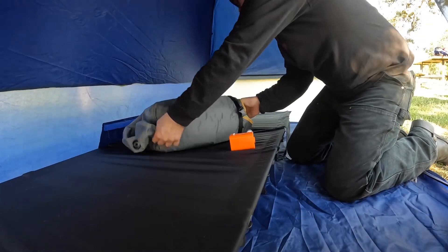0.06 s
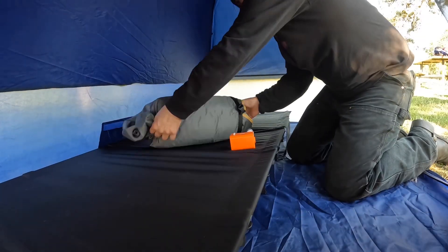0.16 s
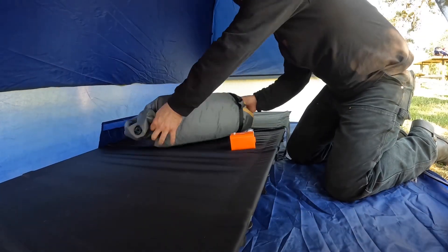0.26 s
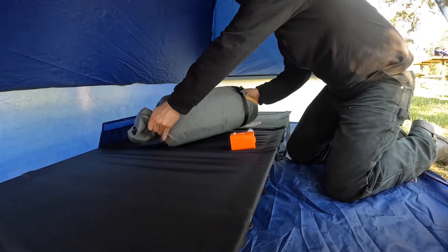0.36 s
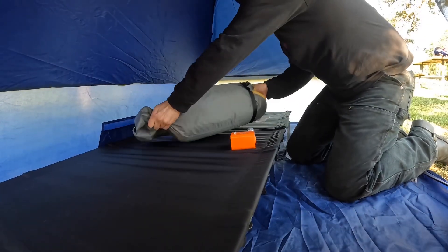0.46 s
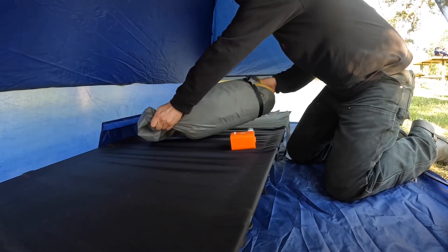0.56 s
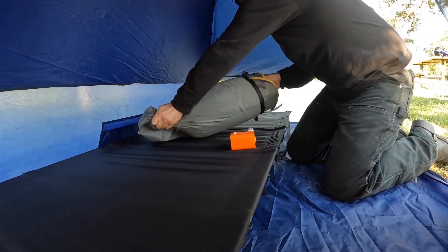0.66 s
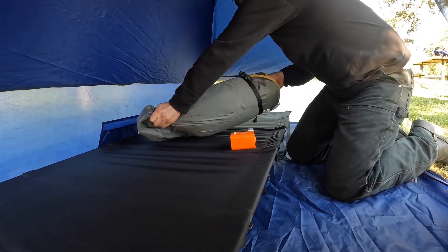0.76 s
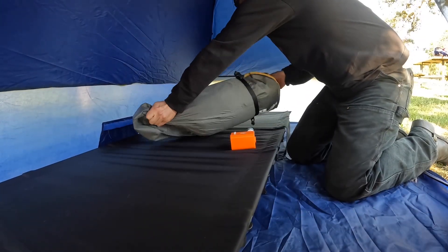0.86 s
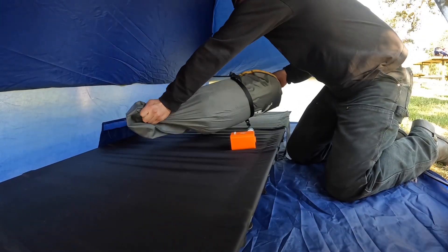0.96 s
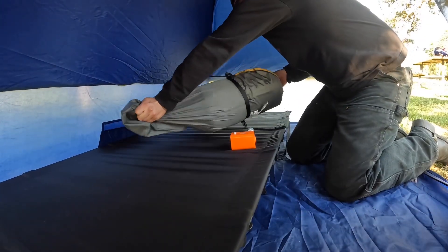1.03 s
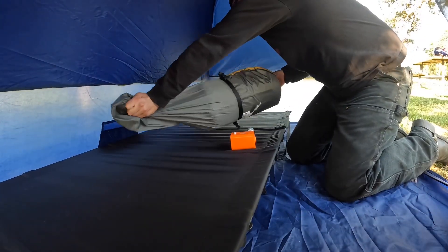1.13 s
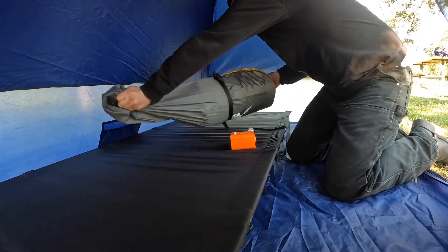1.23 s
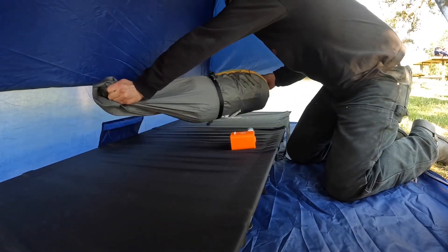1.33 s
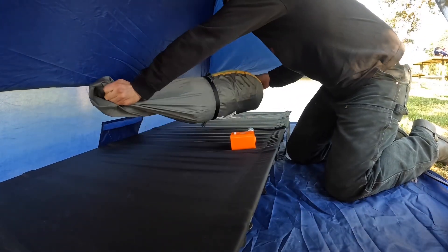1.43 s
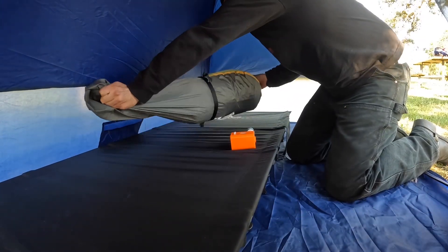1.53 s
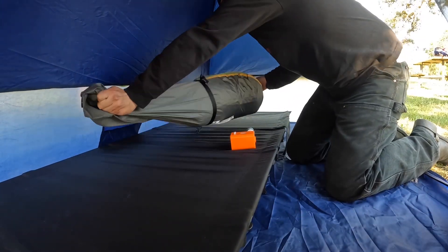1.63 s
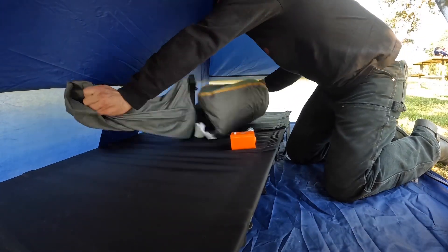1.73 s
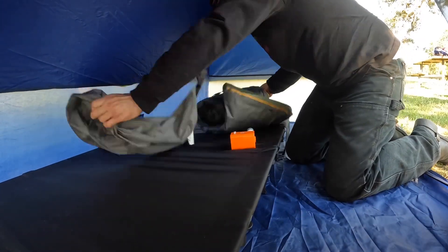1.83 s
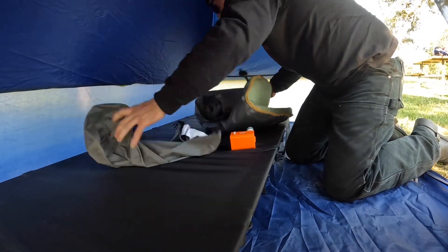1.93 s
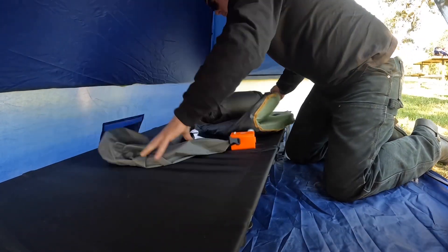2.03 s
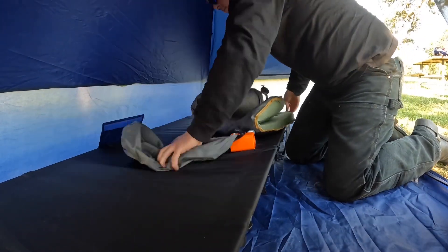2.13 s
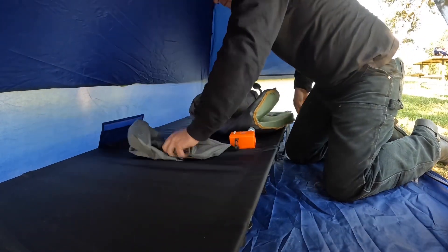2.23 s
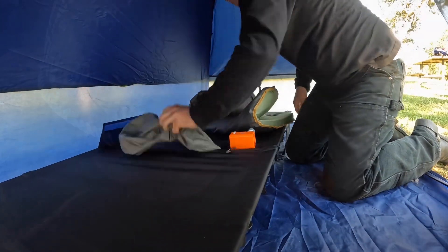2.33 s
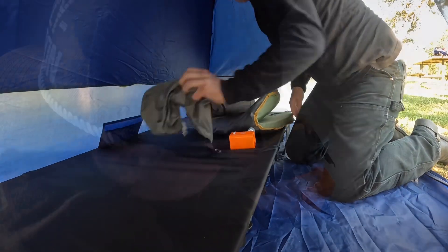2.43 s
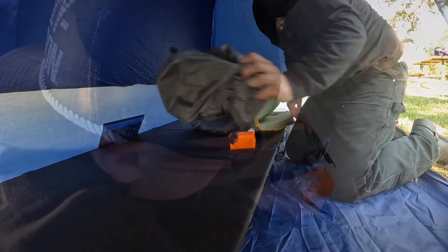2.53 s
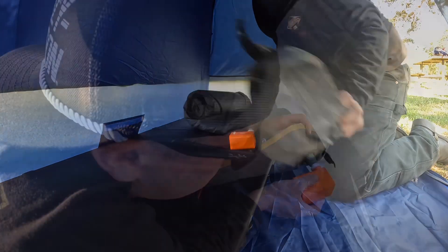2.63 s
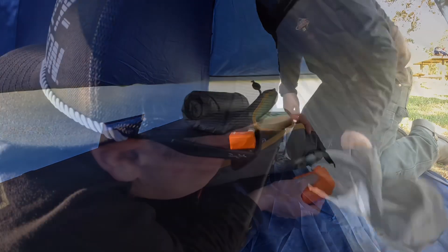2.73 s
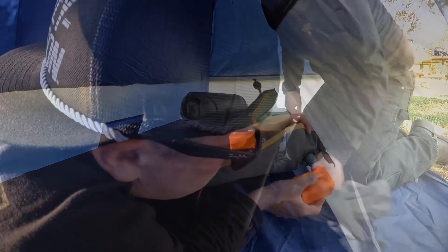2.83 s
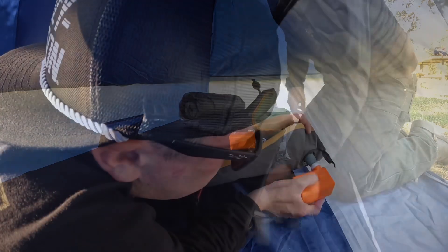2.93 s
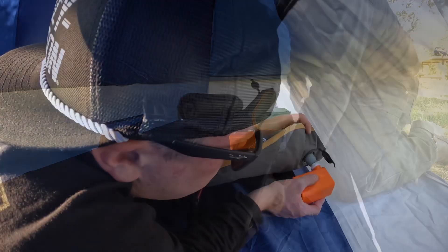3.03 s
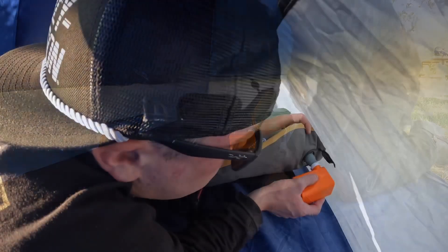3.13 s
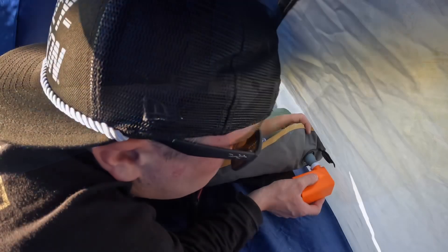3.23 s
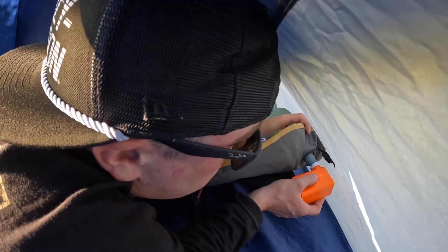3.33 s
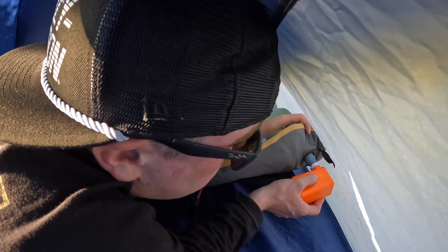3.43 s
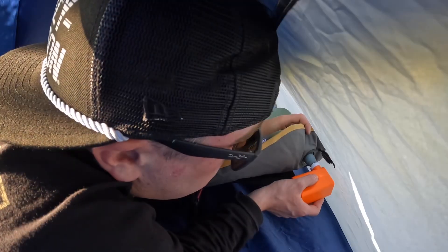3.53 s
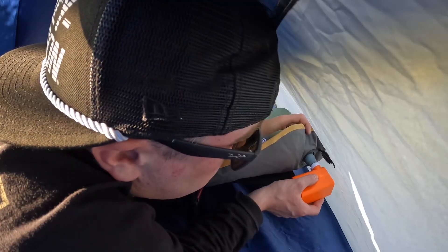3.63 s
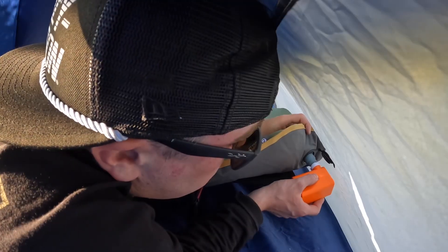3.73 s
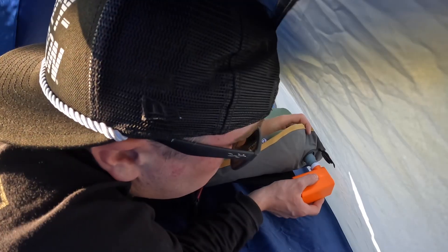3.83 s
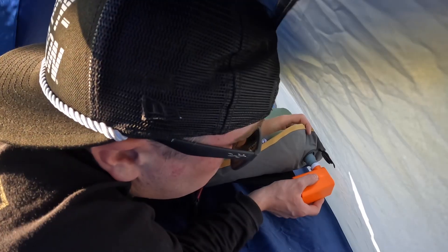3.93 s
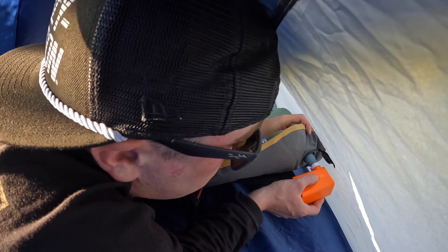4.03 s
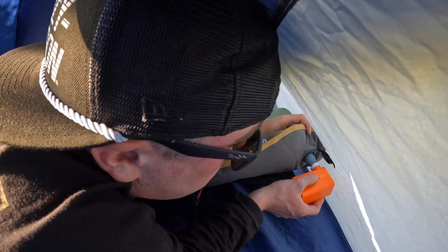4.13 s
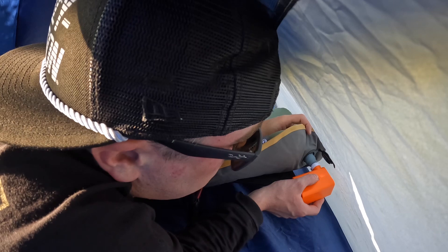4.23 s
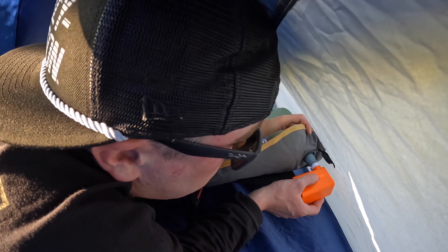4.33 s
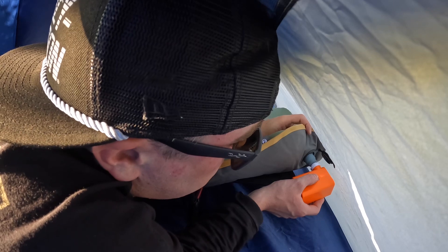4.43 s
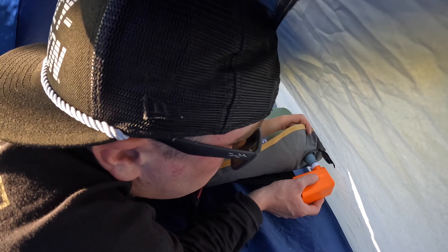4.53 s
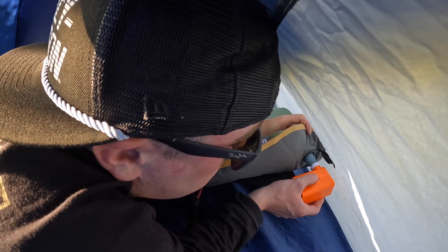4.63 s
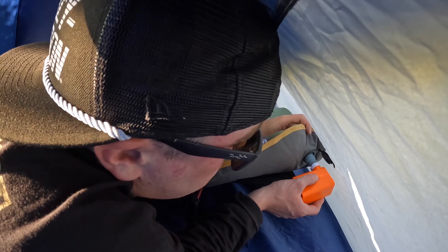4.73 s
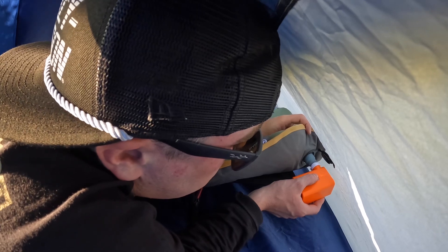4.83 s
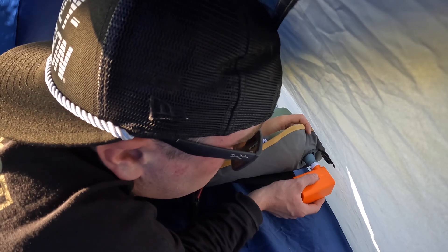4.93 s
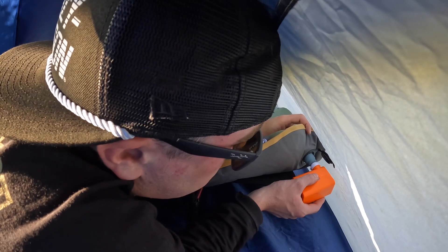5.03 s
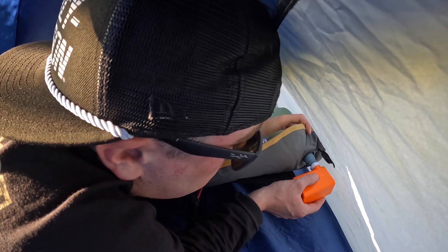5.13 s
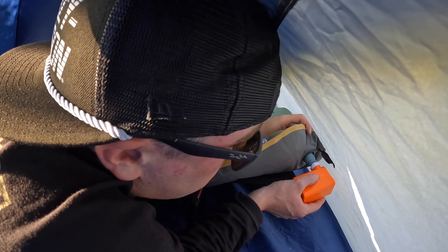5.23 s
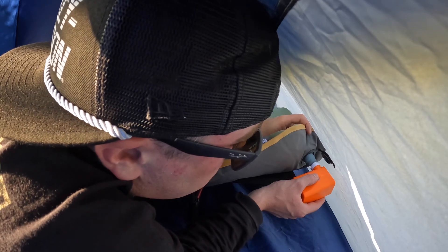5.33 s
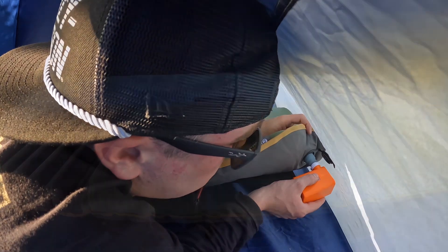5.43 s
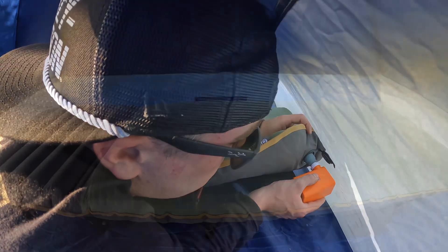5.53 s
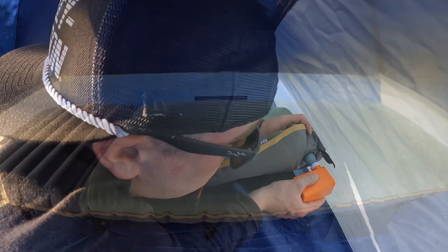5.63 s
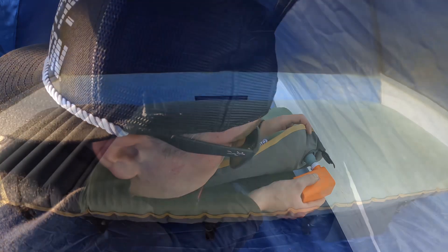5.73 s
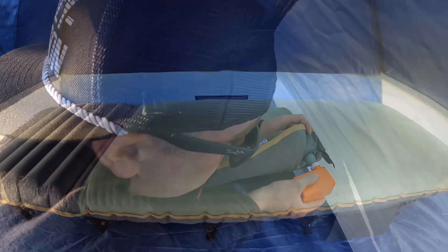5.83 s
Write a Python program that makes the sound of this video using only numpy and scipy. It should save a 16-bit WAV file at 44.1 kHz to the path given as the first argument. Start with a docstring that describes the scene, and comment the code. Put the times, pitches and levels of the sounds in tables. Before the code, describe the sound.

A sleeping pad is tugged from its fabric sack near a stereo microphone: scratchy friction, crackling folds, dull landing, one loud snap. After about three seconds the cloth stops. A hard click follows, then a tiny electric air pump runs with a high tone over rushing air, dry and close, above quiet low outdoor noise.

```python
"""Unpacking a sleeping pad and starting its air pump

Inside a tent, a rolled sleeping pad is pulled from its nylon sack: friction noise hisses and crinkles, folds snap
as short pressure swings, two stick-slip squeaks ring the cloth, and the soft roll thumps down.
A switch clicks and a small battery air pump spins up: shaft-order tones whine over turbulent noise rung by
the housing; its level eases off by some 5 dB from 5.42 s, still running. Filtered noise makes the low outdoor
rumble and faint far wash beneath."""
import sys
import numpy as np
from scipy import signal
from scipy.fft import rfft, irfft
from scipy.io import wavfile

SR = 44100
rng = np.random.default_rng(int(sys.argv[2]) if len(sys.argv) > 2 else 0)


def unload_audio(sound):
    """Save the sound as a 16-bit wav file, at the path given as the first command line argument."""
    columns = np.transpose(np.atleast_2d(sound))
    # keep every value between -1 and 1, then stretch to whole-number steps
    steps = np.round(np.clip(columns, -1, 1) * 32767)
    wavfile.write(sys.argv[1], SR, steps.astype(np.int16))


N = 258955
T = np.arange(N) / SR
HZ = np.fft.rfftfreq(N, 1 / SR)

# Stereo image of cloth and pump at the two microphone ports:
# (frequency [Hz], likeness of the ports [0-1], left lead [rad], left over right [dB])
CLOTH_IMAGE = [(100, 1, -0.12, -1.5), (700, 0.91, -0.27, 2), (1430, 0.83, -0.7, -2.5),
               (2180, 1, -0.16, 0.5), (3330, 0.77, -0.68, 1), (5060, 1, -0.2, -0.5),
               (8000, 0.8, -0.54, 2.5), (15000, 0.22, 0, 3.5)]
PUMP_IMAGE = [(300, 0.75, 0, 0.5), (810, .97, 0.41, -0.5), (1430, 0.85, -1.03, -3), (1750, .88, 0.98, -7.5),
              (2440, 1, 0.34, 3), (2880, 1, -2.06, -4.5), (3300, 0.4, -1, 0), (4470, .98, -0.2, -2),
              (6940, .98, -0.6, -0.5), (15000, 0.58, -0.08, 2)]
# Handfuls of cloth crumpling:
# (start [s], length [s], final level [dB], swell over the stroke [dB], release [dB/s])
FOLDS = [(0, 0.1, -39.5, -2.5, 68), (.29, .08, -47.5, 2, 60), (.43, .1, -39, -3, 52), (.7, .43, -37, 8, 68),
         (1.26, 0.15, -45.5, 3, 132), (1.53, .32, -35.5, 10.5, 120), (1.96, 0.097, -40.5, -1.5, 100),
         (2.14, 0.16, -37.5, 0.5, 176), (2.41, 0.042, -39.5, -2.5, 102), (2.71, .02, -49, -5, 60),
         (2.862, 0.031, -41, -7.5, 99), (3.015, 0.011, -43.5, -5, 150)]

ON_S, SPIN_UP_S, SPIN_UP_SHAPE = 3.55, 0.0756, 1.16  # motor start [s], time constant [s], exponent
BLADES = 8


def amp(db):
    """Decibels to an amplitude factor."""
    return 10 ** (np.asarray(db) / 20)


def unit(x):
    """Scales a signal to rms 1."""
    return x / np.sqrt(np.mean(abs(x) ** 2) + 1e-20)


def read(points, hz=HZ):
    """The columns of a table over frequency, interpolated on a log axis."""
    f, *columns = np.transpose(points)
    return [np.interp(np.log(hz + 1), np.log(f + 1), c) for c in columns]


def follow(rows, t=T):
    """The columns of a table over time."""
    s, *columns = np.transpose(rows)
    return [np.interp(t, s, c) for c in columns]


def add(mix, s, sound):
    """Adds a sound to the mix from this second on."""
    part = mix[max(round(s * SR), 0):][:len(sound)]
    part += sound[:len(part)]


def drift(rate_hz):
    """Smooth chance of rms 1, up to about this rate."""
    return unit(irfft(rfft(rng.standard_normal(N)) * np.exp(-(HZ / rate_hz) ** 2), N))


def resonate(x, hz, width):
    """A resonance of gain 1 that can follow a moving frequency."""
    turn = np.exp(2j * np.pi * np.cumsum(hz * np.ones(len(x))) / SR)
    r = np.exp(-np.pi * width / SR)
    # shift the resonance to 0 Hz, smooth, and shift back
    return 2 * (turn * signal.lfilter([1 - r], [1, -r], x / turn)).real


def bumps(resonances, hz):
    """Gain in dB of a set of resonances; each falls to half its dB at the edges of its width."""
    return sum(db * 2 ** -np.minimum((2 * (hz - centre) / width) ** 2, 20)
               for centre, width, db in resonances)


def ports(z, image):
    """Two unrelated spectra become the partly alike left and right microphone signals."""
    same, lead, tilt_db = read(image)
    same = np.clip(same, 0, 1)
    right = (same * z[0] + np.sqrt(1 - same ** 2) * z[1]) * np.exp(-1j * lead)
    return irfft(np.array([z[0] * amp(tilt_db / 2), right * amp(-tilt_db / 2)]), N)


def noise(colour_db, image, grain=1):
    """Stereo noise of rms 1; grain is the strength of the excitation, sample by sample."""
    spectra = rfft(rng.standard_normal((2, N)) * grain) * amp(colour_db)
    return unit(ports(spectra, image))


def tent(x, image, wet_db):
    """Places a sound between close cloth walls: a short scatter of reflections."""
    t = T[:SR // 8]
    scatter = rng.standard_normal((2, len(t))) * amp(-60 * t / 0.15) * (t > 0.003)
    scatter /= np.linalg.norm(scatter, axis=1, keepdims=True)
    _, lead, tilt_db = read(image)
    direct = np.array([amp(tilt_db / 2), amp(-tilt_db / 2) * np.exp(-1j * lead)])
    return irfft(rfft(x) * (direct + amp(wet_db) * rfft(scatter, N)), N)


def background():
    """Low rumble and a faint far wash come through the tent wall; the wash rises 8.5 dB from 2.65 to 3.15 s."""
    # Level of the rumble: (time [s], level [dB])
    rumble_level = [(0, -30), (.35, -33), (1.6, -35.5), (1.85, -30.5), (2.1, -34), (2.75, -36.5),
                    (3.2, -32.5), (3.7, -33.5), (4.1, -38.5), (5.87, -36.5)]
    # Relative spectra of the rumble and the far wash: (frequency [Hz], level per Hz [dB])
    rumble_colour = [(15, -18), (30, -3), (50, -0.5), (105, 2), (150, -8.5), (220, -13), (330, -26),
                     (600, -39), (2000, -53), (8000, -95)]
    wash_colour = [(150, -19), (350, -10), (550, -6), (800, -5), (1050, -0.5), (1350, -8.5), (1900, -13),
                   (3000, -22.5), (6000, -40), (10000, -38), (14000, -48)]
    # Stereo image: (frequency [Hz], likeness [0-1], left lead [rad], left over right [dB])
    outdoor_image = [(100, .978, 0, .3), (400, .95, 0, 0), (1300, .75, -.3, 0), (8000, .6, 0, 0)]
    rumble = noise(read(rumble_colour)[0], outdoor_image) * amp(follow(rumble_level)[0])
    wash_db = -52 + np.interp(T, [2.65, 3.15], [-6, 2.5])
    return rumble + noise(read(wash_colour)[0], outdoor_image) * amp(wash_db)


def thumps():
    """The soft roll pushes air as it lands: dull puffs with no ring."""
    # The pad shifting and dropping onto the cot: (time of peak [s], level [dB], half-length [s])
    landings = [(1.103, -43, .06), (1.574, -40, 0.074), (1.724, -40, 0.031), (1.818, -32, 0.024),
                (2.883, -48, 0.017)]
    # Relative spectrum of the puffs: (frequency [Hz], level per Hz [dB])
    thud_colour = [(60, -6), (130, -2), (200, -0.5), (290, -4.5), (420, -21), (900, -24), (4000, -70)]
    push = sum(amp(db) * np.exp(-((T - s) / length) ** 2) for s, db, length in landings)
    return push * noise(read(thud_colour)[0], CLOTH_IMAGE)


def strokes(rows):
    """Gain of a run of hand strokes: each takes hold, swells as it goes and dies away."""
    power = 1e-12
    for start, length, db, swell_db, release in rows:
        attack_s = 0.14 * np.sqrt(length)  # shorter strokes take hold faster
        attack = np.clip(1 + (T - start) / attack_s, 0, 1)  # complete at the start time
        to_go = np.clip(1 - (T - start) / length, 0, 1)
        release_db = release * np.maximum(T - start - length, 0)
        power = power + (attack * amp(db - swell_db * to_go - release_db)) ** 2
    return np.sqrt(power)


def creases(per_s, spread_db, size, length):
    """Excitation of cloth: steady friction plus brief slips of very uneven size."""
    slips = (rng.random(N) < per_s / SR) * amp(spread_db * np.minimum(rng.exponential(1, N), 4))
    slip_power = signal.lfilter([size ** 2], [1, -np.exp(-1 / (length * SR))], slips ** 2)
    return np.sqrt(1 + slip_power)


def nylon(crumple_db=-0.43, judder_db=0.86, clump_db=2, brighten=0.34):
    """Nylon sliding on nylon hisses, brighter in a strong pull; its folds crumple in coarser grains."""
    # Pulls of nylon over nylon, before judder and brightening:
    # (start [s], length [s], final level [dB], swell over the pull [dB], release [dB/s])
    pulls = [(0, 0.13, -36.5, -1.5, 160), (.29, 0.11, -42.5, 1, 70), (.43, 0.75, -33.5, 2, 90),
             (1.29, 0.12, -38, 1, 480), (1.535, .315, -35, 4.5, 126), (1.98, 0.058, -40.5, -2, 80),
             (2.14, .15, -33.5, 7.5, 400), (2.35, .13, -46, -6.5, 67), (2.6, 0.41, -52.5, -0.5, 90),
             (2.856, 0.022, -43, -3.5, 130), (3.016, 0.03, -46.5, -4.5, 90)]
    # Relative spectra of smooth sliding and of crumpling: (frequency [Hz], level per Hz [dB])
    hiss_colour = [(300, -34), (1500, -11), (3000, -4), (5200, -1), (7300, -1.5), (8700, -9),
                   (12000, -10.5), (13700, -19.5), (15500, -26)]
    crumple_colour = [(100, 0), (300, 0.5), (500, -4.5), (800, -1.5), (1150, 2.5), (1700, -4), (2800, -2),
                      (4500, -7.5), (9000, -24), (15000, -48)]
    slide, judder = strokes(pulls), drift(30)
    hiss = noise(read(hiss_colour)[0], CLOTH_IMAGE, creases(500, 1.9, 0.49, 0.00014))
    sizzle = irfft(rfft(hiss) * np.interp(HZ, [6500, 9000], [0, 1]), N)  # the top of the hiss
    hiss = hiss + sizzle * ((slide / amp(-42)) ** brighten - 1)
    hiss = hiss * amp(judder_db * judder)
    folds = noise(read(crumple_colour)[0], CLOTH_IMAGE, creases(180, 4.3, 0.74, 0.00036))
    folds = folds * amp(crumple_db + clump_db * judder)
    return hiss * slide + folds * strokes(FOLDS)


def crackle(per_s=16, over_db=9, spread_db=1.5, centre_hz=1970, octaves=1):
    """Small snaps at random moments, as strong as the crumpling around them; rows as for the loud snaps."""
    at = np.flatnonzero(rng.random(N) < per_s / SR)
    size, pitch = rng.standard_normal((2, N))[:, at]
    db = 20 * np.log10(strokes(FOLDS)[at]) + over_db + spread_db * size
    return list(zip(T[at], db, centre_hz * 2 ** (octaves * pitch), np.ones(len(at))))


def snaps(shiver=0.14, shiver_s=0.0051, width_hz=1400):
    """A taut fold flips over: a few pressure swings, then a brief shiver of the cloth."""
    # The loud folds snapping: (time [s], peak before the tent [dB], pitch [Hz], ring length [cycles])
    loud_snaps = [(0.068, -15.5, 1420, 0.52), (0.138, -27, 1180, 2.3), (1.0637, -24, 1940, 1),
                  (1.8602, -21.5, 2500, 0.76), (1.9012, -18.5, 2420, 0.71), (2.0156, -17, 1900, 0.42),
                  (2.0447, -16, 2240, 0.75), (2.2459, -8.5, 3480, 0.43), (2.4446, -27, 1950, 0.91),
                  (2.507, -29, 1450, 0.64), (2.7246, -29, 1900, 0.52), (2.848, -25, 3400, 1),
                  (2.8613, -16.5, 1280, 0.82), (2.8767, -22, 1550, 0.7), (2.8942, -25, 2740, 1.6),
                  (3.016, -23.5, 2400, 1.2), (3.0191, -23.5, 2900, 1.8), (3.0216, -19.5, 3900, .6)]
    out = np.zeros(N)
    t = T[:SR // 16] - T[SR // 200]  # zero at the peak of the flip
    shake = rng.standard_normal(N + len(t))
    for s, db, hz, cycles in loud_snaps + crackle():
        flip = np.exp(-(t * hz / cycles) ** 2) * np.cos(2 * np.pi * hz * t)
        cloth = resonate(resonate(shake[round(s * SR):][:len(t)], hz, width_hz), hz, 4000)
        tail = unit(cloth) * np.exp(-abs(t) / shiver_s) * (t > 0)
        add(out, s + t[0], amp(db) * (flip + shiver * tail))
    return tent(out, CLOTH_IMAGE, wet_db=-9.5)


def squeaks(width_hz=300, jitter=0.03, scrape=0.046):
    """Gripped nylon sticks and slips ever faster, ringing higher and shaking the sack less as it tightens."""
    # Stick-slip squeaks: (start [s], length [s], level [dB], moment of tightening [s], slip rate slack [1/s],
    # slip rate taut [1/s], ring slack [Hz], ring taut [Hz], slack sack body over ring [dB])
    grips = [(0.022, 0.007, -27.5, .013, 640, 1240, 636, 1200, -22),
             (2.228, .019, -20, 2.233, 198, 345, 820, 2790, 1.5)]
    # Resonances of the sack: (frequency [Hz], width [Hz], relative level [dB])
    sack = [(446, 72, -5), (684, 180, 8), (875, 110, 2)]
    rise_db_per_s, fall_db_per_s = 522, 680
    tighten_s, taut_body_db = 0.00798, -8.5
    out = np.zeros(N)
    for start, length, db, tighten_at, slack_rate, taut_rate, slack_hz, taut_hz, sack_db in grips:
        t = T[abs(T - start - length / 2) < 1 / 10]
        taut = (1 + np.tanh((t - tighten_at) / (2 * tighten_s))) / 2
        rate = slack_rate + (taut_rate - slack_rate) * taut ** 2
        ring_hz = slack_hz + (taut_hz - slack_hz) * taut
        body_db = sack_db + taut_body_db * taut
        grip_db = db - rise_db_per_s * np.maximum(start - t, 0)
        grip_db = grip_db - fall_db_per_s * np.maximum(t - start - length, 0)
        turns = np.cumsum(rate * (1 + jitter * drift(190)[:len(t)])) / SR
        slips = np.diff(np.floor(turns), prepend=0)  # one impulse a slip
        slips = slips + scrape * rng.standard_normal(N)[:len(t)]
        ring = resonate(resonate(slips, ring_hz, width_hz), ring_hz, 1200)
        body = sum(amp(d) * resonate(resonate(slips, f, w), f, 900) for f, w, d in sack)
        blend = (unit(ring) + amp(body_db) * unit(body)) / np.hypot(1, amp(body_db))
        add(out, t[0], amp(grip_db) * blend)
    return tent(out, CLOTH_IMAGE, wet_db=-13)


def switch():
    """The button clicks down and up, ringing the plastic case."""
    # Clicks: (time [s], peak before the tent [dB])
    clicks = [(3.5239, -19), (3.557, -46)]
    # Modes of the plastic case: (frequency [Hz], relative level [dB], time to fall 60 dB [s])
    case = [(1020, 0, 0.026), (2920, 2, 0.015), (3880, 8, 0.017), (4130, 6, 0.013), (5700, -8, .012),
            (7600, 6, 0.013), (11500, -22, 0.022)]
    out, t = np.zeros(N), T[:SR // 16]
    ring = sum(amp(db - 60 * t / t60) * np.sin(2 * np.pi * hz * t) for hz, db, t60 in case)
    contact = resonate(rng.standard_normal(len(t)), 4000, 5000) * 2 * np.exp(-t / 0.002)
    ring += contact
    for s, db in clicks:
        add(out, s, amp(db) * ring / abs(ring).max())
    return tent(out, PUMP_IMAGE, wet_db=-11)


def spin():
    """The motor's share of its running speed, 0 to 1, closing in on it after switch-on."""
    return 1 - np.exp(-(np.maximum(T - ON_S, 0) / SPIN_UP_S) ** SPIN_UP_SHAPE)


def shaft():
    """Turns of the impeller per second, the running speed shifting a little with the load."""
    # Running speed: (time [s], blade tone [Hz])
    running = [(3.9, 3417), (4.014, 3414), (4.492, 3395), (5.068, 3393), (5.38, 3346), (5.776, 3407),
               (5.87, 3390)]
    return spin() * follow(running)[0] / BLADES


def rattle(level_db=-14.5, knock_turns=0.47):
    """The rotor scrapes once a turn and shakes the plastic shell, as hard as speed times starting torque."""
    # Resonances of the shell: (frequency [Hz], width [Hz], relative level [dB])
    shell_modes = [(2930, 460, 1), (3660, 190, -1), (4700, 130, -2.5)]
    turns, torque = np.cumsum(shaft()) / SR, 1 - spin()
    scrapes = rng.standard_normal(N) * (1.2 + np.exp(-(turns % 1) / knock_turns))
    shell = sum(amp(db) * resonate(resonate(scrapes, hz, width), hz, 1200) for hz, width, db in shell_modes)
    return tent(unit(shell) * amp(level_db) * spin() * torque, PUMP_IMAGE, wet_db=-16)


def air(level_db=-25.5, growth_db=23, churn_db=0.34):
    """Turbulent air rings the cavities of the pump housing, louder as the impeller speeds up."""
    # Relative spectrum of the rush: (frequency [Hz], level per Hz [dB])
    air_colour = [(150, -5.5), (400, -13), (720, -6.5), (900, 4), (1350, 3.5), (2200, -6), (3200, 2),
                  (4200, -4), (6500, -4), (8200, -9.5), (10500, -14.5), (12500, -15.5), (13700, -24),
                  (14600, -40)]
    # Cavity resonances of the housing: (frequency [Hz], width [Hz], gain [dB])
    housing = [(627, 120, 5.5), (703, 54, -9.5), (984, 245, 9.5), (1264, 160, 3), (1800, 380, 7.5),
               (2480, 420, 3), (2843, 130, 8.5), (3039, 120, 9.5), (4030, 240, -0.5), (4140, 67, 8),
               (4400, 200, -3.5), (4784, 280, 9), (4943, 206, 8), (5190, 160, 11), (5730, 350, 7),
               (6680, 260, 5.5), (7470, 280, 6.5), (10570, 450, 6)]
    rush = noise(read(air_colour)[0] + bumps(housing, HZ), PUMP_IMAGE)
    # growth is in dB per tenfold speed
    return rush * amp(level_db + churn_db * drift(70)) * spin() ** (growth_db / 20)


def whine(level_db=-20.5, growth_db=136, flutter=0.00128):
    """Tones at multiples of shaft speed grow with it and flare in the outlet; turbulence makes each waver."""
    # Strong tones, before the outlet:
    # (shaft order, relative level [dB], unsteadiness [ratio], left lead [rad], left over right [dB])
    beams = [(7, -8, 0.26, -0.12, 2), (8, -0.24, 0.071, -1.08, -2), (16, -17.5, .35, -0.35, 2)]
    # Weaker tones, placed by the pump's image; the order is rounded for the pitch:
    # (shaft order, relative level [dB], unsteadiness [ratio])
    weak_orders = [(1, -27.5, 0.15), (5.1, -20.5, 0.21), (9, -20.5, 0.25), (10, -25, 0.3),
                   (11.1, -17.5, 0.45), (12, -24, 0.49), (13, -31, .5), (18, -29.5, .5), (24, -29, 0.7)]
    # Outlet resonances that the tones flare through on the way up: (frequency [Hz], width [Hz], gain [dB])
    outlet = [(2813, 130, 13), (3090, 134, 8.5), (4768, 127, 15), (5690, 280, 25.5), (6080, 350, 10),
              (6470, 140, 13), (7460, 143, 11), (9200, 1030, 14)]
    speed = shaft()
    strength = amp(level_db) * spin() ** (growth_db / 20)  # growth in dB per tenfold speed
    angle = 2 * np.pi * np.cumsum(speed * (1 + flutter * drift(20.5))) / SR
    weak = [(k, db, waver, *read(PUMP_IMAGE, k * speed[-1])[1:]) for k, db, waver in weak_orders]
    out, outlet_db = np.zeros((2, N)), bumps(outlet, HZ)
    for order, db, waver, lead, tilt_db in beams + weak:
        k = round(order)
        gusts = (drift(37) + 1j * drift(28)) / np.sqrt(2)
        unsteady = (1 + waver * gusts) / np.hypot(1, waver)
        tone = amp(db + np.interp(k * speed, HZ, outlet_db)) * np.exp(1j * k * angle) * unsteady
        sides = [amp(tilt_db / 2), amp(-tilt_db / 2) * np.exp(-1j * lead)]
        out += np.outer(sides, tone).real
    return out * strength


def scene():
    """Cloth first, then the pump, over the outdoor background."""
    cloth = thumps() + nylon() + snaps() + squeaks()
    ease_db = -12.5 * np.maximum(T - 5.42, 0)  # the pump's sound fades by some 5 dB
    pump = (switch() + rattle() + air() + whine()) * amp(ease_db)
    return background() + cloth + pump


def record(dry):
    """The recorder's band limit: a steep low-pass at 15750 Hz."""
    lowpass = signal.firwin(511, 15750, window=("kaiser", 9), fs=SR)
    return signal.oaconvolve(dry, lowpass[None], "same")


dry = scene()
out = record(dry)
unload_audio(out)
```